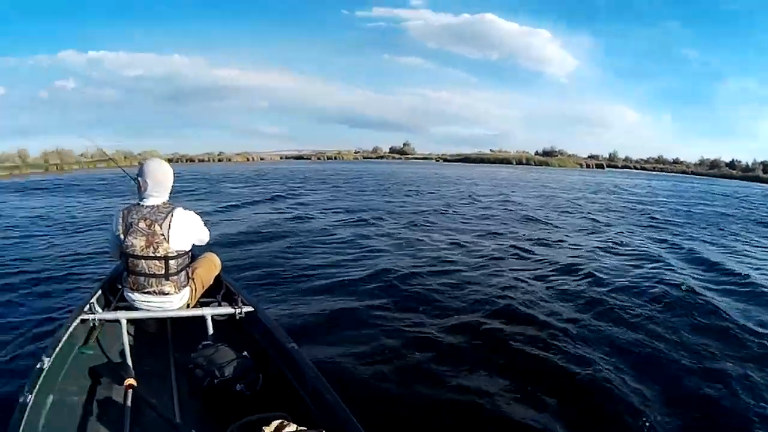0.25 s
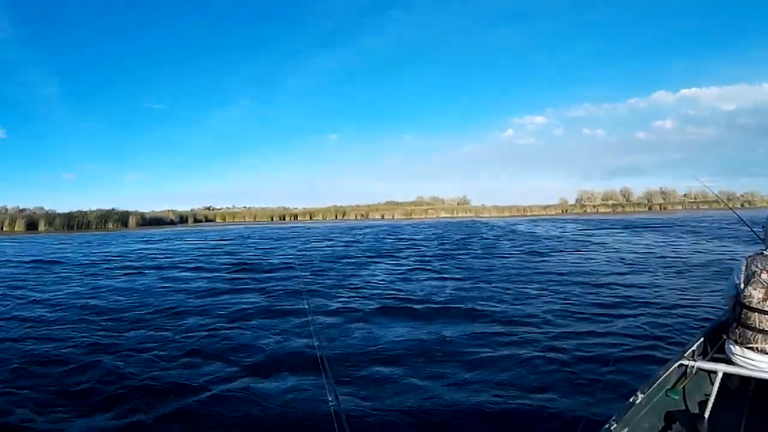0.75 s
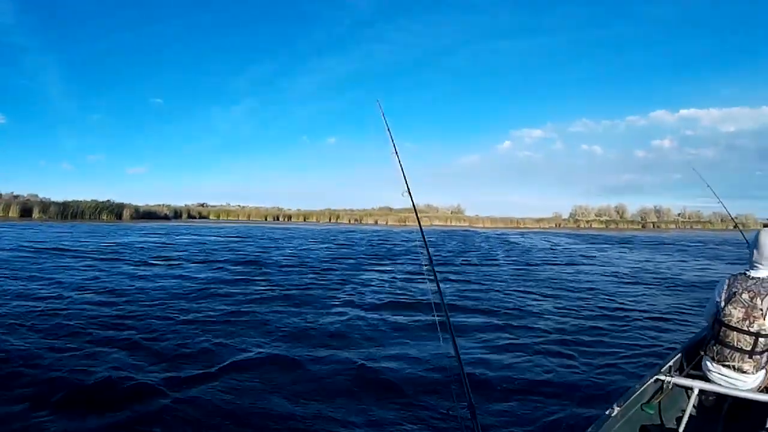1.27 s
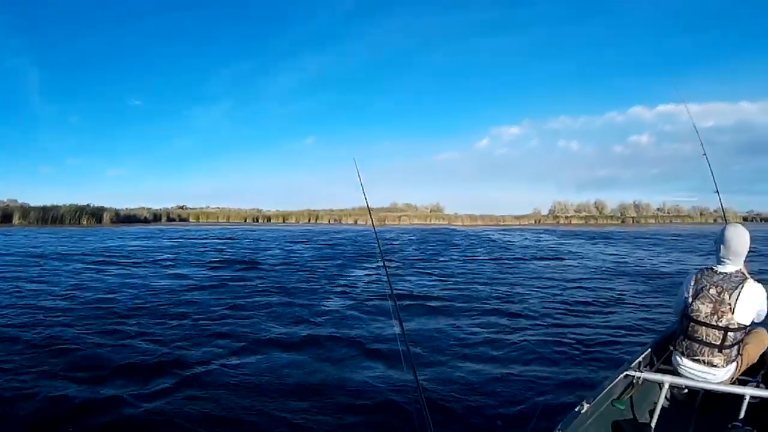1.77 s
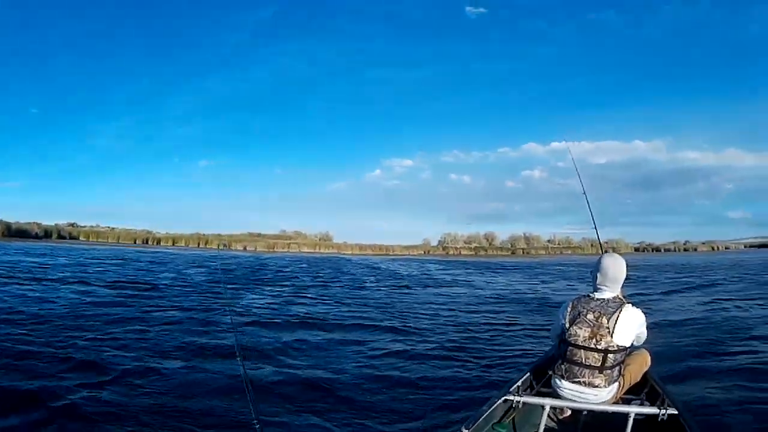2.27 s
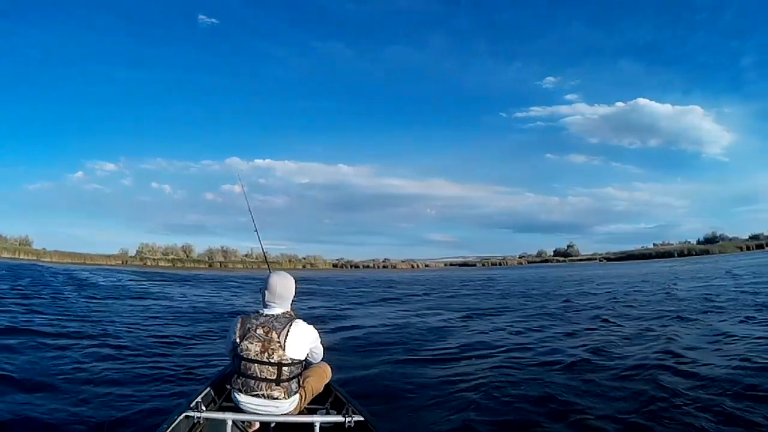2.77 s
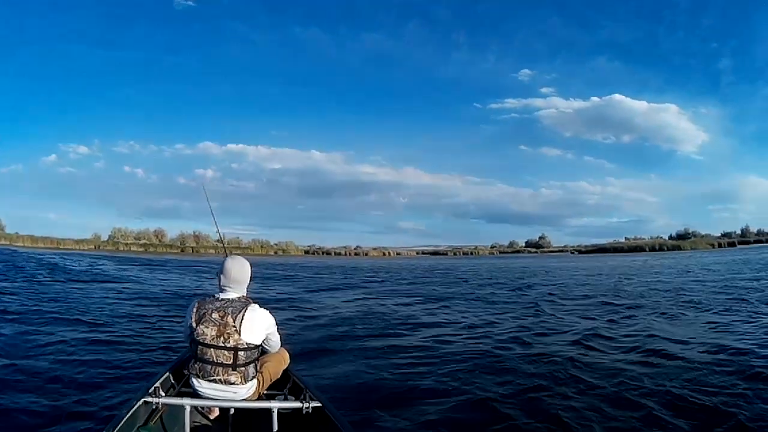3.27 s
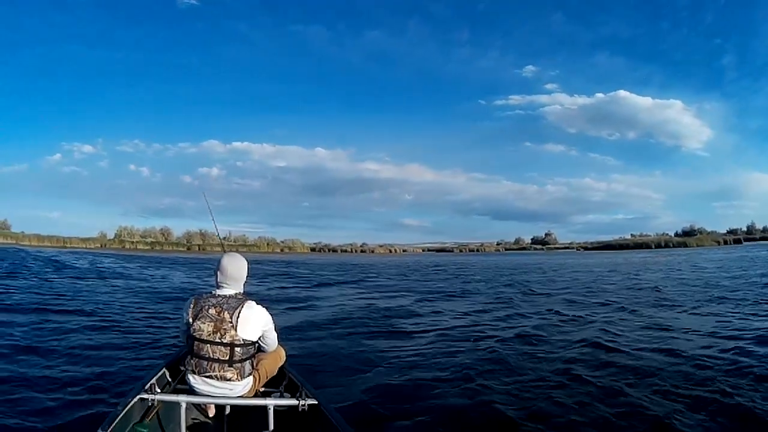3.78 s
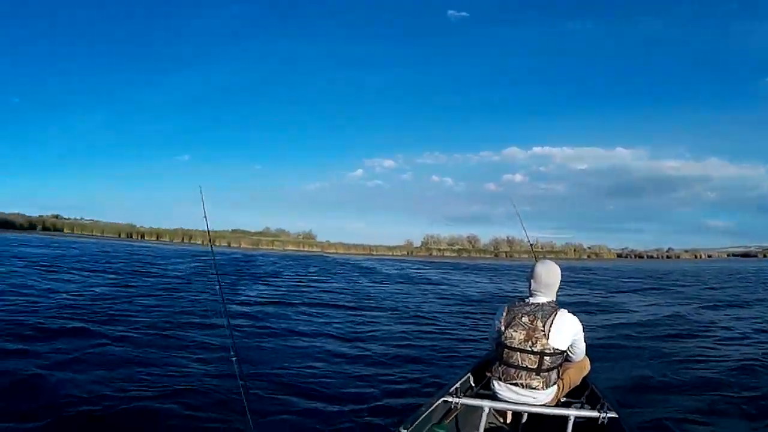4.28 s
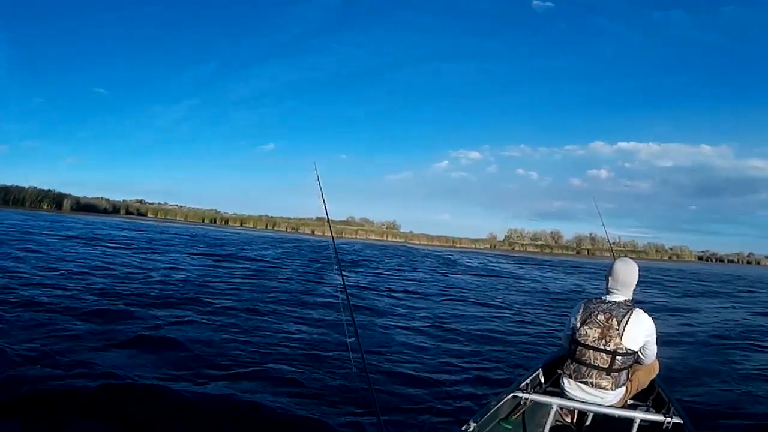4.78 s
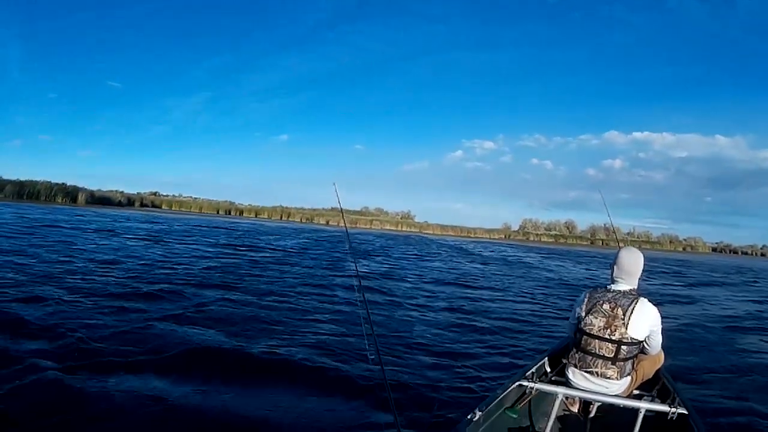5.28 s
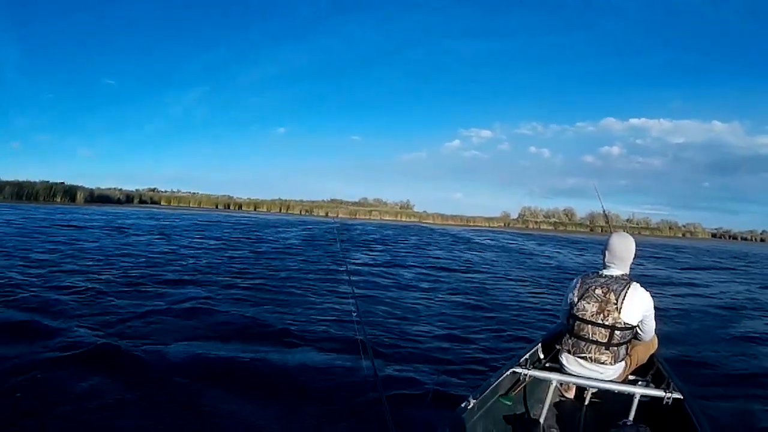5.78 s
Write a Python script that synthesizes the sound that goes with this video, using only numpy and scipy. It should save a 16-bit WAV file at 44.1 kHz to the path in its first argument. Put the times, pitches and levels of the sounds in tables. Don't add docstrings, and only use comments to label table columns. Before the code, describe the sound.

Two loud low gusts flutter, thump and crackle against a microphone in a closed casing, separated by a quiet lull of soft rushing air.

```python
import sys
import numpy as np
from scipy import signal
from scipy.fft import rfft, irfft
from scipy.io import wavfile
from scipy.ndimage import uniform_filter1d

SR = 44100
rng = np.random.default_rng(int(sys.argv[2]) if len(sys.argv) > 2 else 0)


def gain_from_db(level_db):
    decades = np.asarray(level_db, float) / 20
    return 10 ** decades


def bounce(signal):
    frames = np.transpose(np.atleast_2d(signal))
    limited = np.clip(frames, -1, 1)
    pcm = np.round(limited * 32767).astype(np.int16)
    wavfile.write(sys.argv[1], SR, pcm)


N = 266364
SILENT_DB = -120

LAYER_HZ = [55, 270, 1050, 3300]
# f/Hz, density/dB per Hz
CASING_COLOUR = [(18, -18.5), (40, -5), (80, -1), (170, -2.5), (320, -6), (650, -13), (1600, -22.5),
                 (2150, -31.5), (2800, -36.5), (3200, -43), (4900, -51), (5600, -57.5), (6900, -61.5),
                 (7700, -72.5)]
# f/Hz, gain/dB
CAVITY_RESPONSE = [(10, 0), (3000, 0), (3500, -4), (4100, 2.5), (4600, 2), (5200, 0), (20000, 0)]


def turbulence(slap_rows, spit_rows):
    wind_db = -17.5
    layers_db = wind_layers_db()
    gust = np.clip((layers_db[1] + 19.5) / 16, 0, 1)
    layers_db -= 10 * np.log10(np.mean(gain_from_db(2 * layers_db), axis=1, keepdims=True))

    spectrum = rfft(colour(CAVITY_RESPONSE, noise(CASING_COLOUR)))
    octave = np.log2(np.arange(len(spectrum)) * SR / N + 1)
    slapped = stir(slap_rows, ms=3.3, reach_db=18.0)
    spat = stir(spit_rows, ms=3.3, reach_db=16.0)
    burst, surge, shared = walk(330), walk(100), walk(60)
    index = np.arange(4)
    out = np.zeros(N)
    for centre in np.arange(4, 13.6, 0.5):
        band = irfft(spectrum * np.clip(1 - 2 * abs(octave - centre), 0, 1), N)
        span = int(np.clip(16 / 2 ** centre, 0.05, 0.3) * SR)
        band = band * (np.mean(band ** 2) / uniform_filter1d(band ** 2, span)) ** 0.25

        place = np.interp(centre, np.log2(LAYER_HZ), index)
        low = min(int(place), 2)
        level_db = layers_db[low] + (place - low) * (layers_db[low + 1] - layers_db[low])

        shared = 0.67 * shared + 0.89 * walk(60)
        depth_db = np.interp(place, index, [0.4, 2.8, 4.0, 5.55]) * (0.37 + 0.48 * gust)
        drive = 1.04 * burst + 0.47 * surge + 0.34 * shared
        flicker_db = 1.49 * depth_db * np.tanh(drive / 1.69)
        flicker_db += np.interp(place, index, [9, 11.5, 0.5, -7.0]) * slapped
        flicker_db += np.interp(place, index, [0, 1.8, 2.0, 8.5]) * spat
        flicker_db -= 10 * np.log10(uniform_filter1d(gain_from_db(2 * flicker_db), SR // 8))
        out += band * gain_from_db(level_db + flicker_db)
    return out * gain_from_db(wind_db)


# t/s, level/dB, eddy size/dB of extra rumble
GUST = [(0, -30, -3), (.38, -27.5, -2), (.5, -24, 3.5), (.66, -17, 1.5), (1.1, -15.5, 1.5), (1.4, -17, -1),
        (1.83, -19, -3), (1.92, -24.5, -2.5), (2.4, -29.5, 4), (2.6, -34.5, 3), (3.15, -33.5, -4.5),
        (3.8, -33, 5), (4.2, -28.5, 4), (4.45, -22, -1), (4.65, -19, -5), (5.2, -17.5, 3),
        (5.75, -18, -0.5), (6.04, -20.5, 0)]
# t/s, level/dB
STREAM = [(0.0, -38.5), (0.08, -39), (0.22, -43.5), (0.39, -48), (1.02, -49), (1.48, -52), (1.58, -48.5),
          (1.77, -55), (2.37, -54), (2.73, -47.5), (3.01, -50), (3.36, -49.5), (3.65, -47.5), (4.44, -48),
          (4.69, -47.5), (5.38, -48.5), (5.68, -49.5), (6.04, -50)]
# gust slope/dB per dB, stream share/dB (rush: gust share/dB), puff slope/dB per dB
LAYERS = [
    (1.14, -9, 0.5),
    (1.11, -36, 1.26),
    (1.38, -10.5, 1),
    (5.3, -8.5, 1.14),
]
EDDY_SHARE = [1, 0, 0, 0.08]
LAYER_PLACE = [-1.2, -0.92, 0.065, 1]


def wind_layers_db():
    full_gust_db, full_stream_db = -16, -46
    gust_db = curve(GUST) - full_gust_db
    stream_db = curve(STREAM) - full_stream_db
    eddy_db = curve(GUST, index=2)
    puff_db, lean_db = puffs()
    levels = []
    for i, (slope, share_db, puff_slope) in enumerate(LAYERS):
        layer_gust_db, layer_stream_db = slope * gust_db, stream_db
        if i < 3:
            layer_stream_db = stream_db + share_db
        else:
            layer_gust_db = layer_gust_db + share_db
        power = gain_from_db(2 * layer_gust_db) + gain_from_db(2 * layer_stream_db)
        ride_db = puff_slope * (puff_db + LAYER_PLACE[i] * lean_db)
        levels.append(10 * np.log10(power) + ride_db + EDDY_SHARE[i] * eddy_db)
    return np.array(levels)


# t/s, swell/dB, half width/ms, lean/-1 low to +1 high
PUFFS = [(0.342, -1.5, 52, -0.17), (0.441, -2.5, 13, -1.3), (0.781, 1.5, 39, .2), (0.951, -3, 33, .3),
         (1.044, 2, 16, 0.79), (1.2, 1.5, 33, .8), (1.275, -4.5, 14, 0.84), (1.352, 2.5, 21, 0.28),
         (1.456, -4.5, 18, 0.11), (1.701, -4, 47, 0.24), (1.805, 0.5, 84, -0.18), (1.9, -3, 20, .1),
         (1.98, 3, 30, .6), (2.248, -4.5, 30, -0.13), (2.391, 3.5, 37, -0.42), (2.64, 2.5, 25, 1),
         (2.796, 4.5, 37, -0.026), (3.5, 3.5, 30, -0.022), (3.992, 3.5, 30, 0.84), (4.1, 2, 43, 1),
         (4.242, -4, 24, 0.45), (4.536, -3.5, 20, 0.014), (4.651, 3.5, 89, -0.028), (4.897, 2.5, 20, -0.68),
         (4.956, -2.5, 13, -0.22), (5.17, 3, 55, .1), (5.246, -10.5, 7.1, .3), (5.329, 6, 18, 0.0073),
         (5.785, -3.5, 63, 0.21), (5.867, 6, 6.2, 0.43)]


def puffs():
    ms = np.arange(N) * 1000 / SR
    out = np.zeros((2, N))
    for s, db, width_ms, lean in PUFFS:
        bump = np.exp(-((ms - s * 1000) / width_ms) ** 2)
        out += np.outer([db, db * lean], bump)
    return out


# t/s, peak level/dB, width/ms
SLAPS = [(0.4322, -4.5, 1.9), (0.5828, -0.5, 1.16), (0.704, -14, 3.8), (0.9523, 0, 0.97), (1.001, -3, 1.5),
         (1.0761, 0, 2.9), (1.12, -1, 0.89), (1.1407, -3, 0.95), (1.254, -3, 1.7), (1.3749, -1, 3.4),
         (1.4475, -2, 0.97), (1.71, -1.5, 0.88), (1.7636, 1, 0.93), (1.7792, -2, 1), (1.7896, -4, 1.23),
         (1.816, -3.5, 1.4), (2.1025, -11, 1.8), (2.2062, -12, 2.3), (2.3783, -12.5, 1),
         (4.4109, -5.5, 1.2), (4.4648, -2.5, 1.05), (5.0204, -3.5, 2.7), (5.1504, -5.5, 0.59),
         (5.2007, -0.5, 0.89), (5.2633, 0.5, 1.1), (5.323, 1, 1.2), (5.3967, 1, 1.05), (5.4206, 0, 0.9),
         (5.5565, 3, 0.83), (5.8677, -3.5, 2.2)]


def slaps(rows):
    out = np.zeros(N)
    k = np.arange(-SR // 50, SR // 50)
    chance = rng.random((len(rows), 2))
    for (s, db, ms), (side, lean) in zip(rows, chance):
        u = k / (max(ms, 0.4) * SR / 1000 * 0.82)
        swing = np.exp(-u ** 2 / 2) * (1 - u ** 2 + 0.39 * (lean - 0.5) * u)
        out[int(s * SR) + k] += gain_from_db(db - 3.5) * np.sign(side - 0.7) * swing
    return out


def small_slaps():
    over_gust_db, spread_db, width_ms, max_db = 10.5, 3.5, 1.82, -5.5
    s, gust_db, (size, width, _, _) = scatter(count=64)
    db = gust_db + over_gust_db + spread_db * size
    return list(zip(s, np.minimum(db, max_db), width_ms * np.exp(0.49 * width)))


# t/s, peak level/dB, length/ms, treble level/dB
SPITS = [(0.766, -37, 1.1, -15), (0.8247, -34.5, 2.5, -24), (1.0003, -38, 1.9, -14),
         (1.019, -29.5, 1.1, -19.5), (1.044, -26, 1.1, -20), (1.0485, -35, 1, -12),
         (1.074, -27.5, 0.86, -12), (1.121, -30, 0.51, -16), (1.1415, -36, 1.1, -8), (1.191, -31, 1, -15),
         (1.201, -37.5, 3.9, -10), (1.2083, -24.5, .67, -27), (1.311, -37.5, 0.97, -32.5),
         (1.3472, -29, 0.5, -23.5), (1.6556, -39.5, 1.1, -24), (1.8227, -37, 1.1, -22),
         (2.4117, -42.5, 2.4, -22), (3.63, -40, 1.5, -11), (3.654, -42, 2.5, -8), (4.888, -36.5, 1.1, -12),
         (4.9022, -33.5, 0.49, -20), (5.002, -38, 1.3, -12), (5.0506, -35.5, .51, -8.5),
         (5.177, -27.5, .9, -19), (5.2617, -29, 0.6, -21), (5.323, -33, 1.7, -19),
         (5.3958, -38.5, 0.74, -12), (5.464, -27, 0.36, -15), (5.8716, -39, 1.5, -19),
         (5.9217, -34, .66, -19)]
# f/Hz, density/dB per Hz
SPIT_COLOUR = [(300, -7.5), (700, 27), (1400, 16.5), (2200, 4.5), (3200, 4.5), (4200, 3.5), (5200, -9.5),
               (6500, -29)]
# f/Hz, density/dB per Hz
SNAP_COLOUR = [(4000, -28.5), (5500, 3), (7000, -2.5), (9000, -11.5), (12000, -18), (15500, -24)]


def spits(rows):
    gain_db = 21.0
    dull, bright = np.zeros(N), np.zeros(N)
    k = np.arange(-SR // 200, SR // 200)
    chance = rng.standard_normal((len(rows), len(k)))
    for (s, db, ms, treble_db), air in zip(rows, chance):
        width = max(ms - 0.55, 0.05) * SR / 1000 * 0.61
        jet = air * np.exp(-(k / width) ** 2)
        jet *= gain_from_db(db) * np.sqrt(ms / np.sum(jet ** 2))
        dull[int(s * SR) + k] += jet
        bright[int(s * SR) + k] += jet * gain_from_db(treble_db)
    return (colour(SPIT_COLOUR, dull) + colour(SNAP_COLOUR, bright)) * gain_from_db(gain_db)


def small_spits():
    start_db, full_db = -24, -17
    level_db, spread_db, length_ms, treble_db = -42, 2, 1.4, -19.5
    s, gust_db, (size, length, treble, luck) = scatter(count=260)
    keep = (gust_db - start_db) / (full_db - start_db) > 0.6 + 0.4 * luck
    db = level_db + 0.3 * (gust_db - full_db) + spread_db * size
    db = np.where(keep, db, SILENT_DB)
    return list(np.transpose([s, db, length_ms * np.exp(0.43 * length), treble_db + 4 * treble]))


def scatter(count):
    place, chance = rng.random(count), rng.standard_normal((count, 4))
    s = 0.03 + (N / SR - 0.06) * (np.arange(count) + place) / count
    wind_db = curve(GUST) + puffs()[0]
    return s, wind_db[(s * SR).astype(int)], chance.T


def stir(table, ms, reach_db):
    s, db = np.array(table).T[:2]
    kicks = np.zeros(N)
    strength = np.clip(0.5 + (db - db.max()) / reach_db, 0.2, 1)
    kicks[(s * SR).astype(int)] = strength * (db > SILENT_DB)
    u = np.arange(-SR // 30, SR // 30 + 1) * 1000 / (SR * ms)
    return np.minimum(signal.fftconvolve(kicks, np.exp(-u ** 2), "same"), 1.2)


# f/Hz, density/dB per Hz
HISS_COLOUR = [(3000, -1.5), (8000, 2.5), (12000, 1), (14500, 1), (15500, -15)]


def electronics_hiss():
    hiss_db = -68.5
    return noise(HISS_COLOUR) * gain_from_db(hiss_db + 2.5)


def noise(table):
    y = colour(table, rng.standard_normal(N))
    return y / np.std(y)


def colour(table, x):
    hz, db = np.transpose(table)
    f = np.log(np.arange(N // 2 + 1) * SR / N + 1)
    response_db = np.interp(f, np.log(hz), db, left=-120, right=-120)
    return irfft(rfft(x) * gain_from_db(response_db), N)


def walk(rate_hz):
    k = int(SR / rate_hz)
    held = np.repeat(rng.standard_normal(N // k + 1), k)
    w = uniform_filter1d(uniform_filter1d(held, k), k)[:N]
    return w / np.std(w)


def curve(table, index=1):
    points = np.array(table)
    return np.interp(np.arange(N) / SR, points[:, 0], points[:, index])


def scene():
    slap_rows = SLAPS + small_slaps()
    spit_rows = SPITS + small_spits()
    wind = turbulence(slap_rows, spit_rows) * gain_from_db(-1.0)
    return (wind + slaps(slap_rows) + spits(spit_rows))[None]


def band_limit(x):
    return signal.sosfilt(signal.butter(12, 15790, fs=SR, output="sos"), x)


def record(dry):
    clip = 0.707
    mix = np.clip(dry, -clip, clip) + electronics_hiss()
    return band_limit(mix)


dry = scene()
out = record(dry)
bounce(out)
```